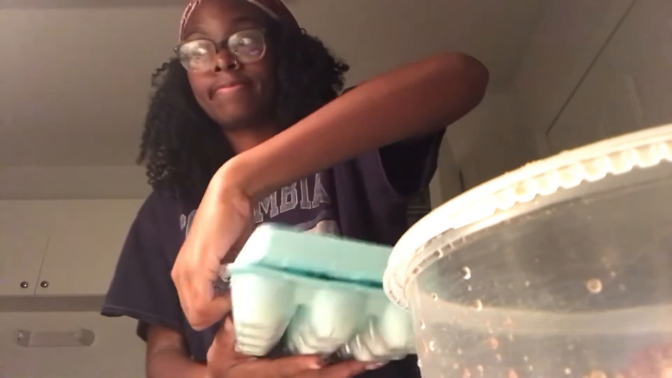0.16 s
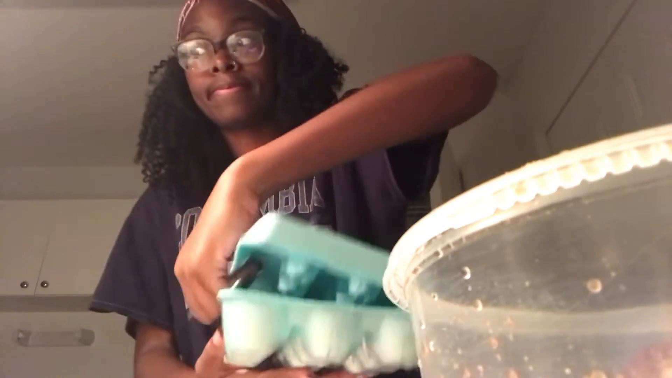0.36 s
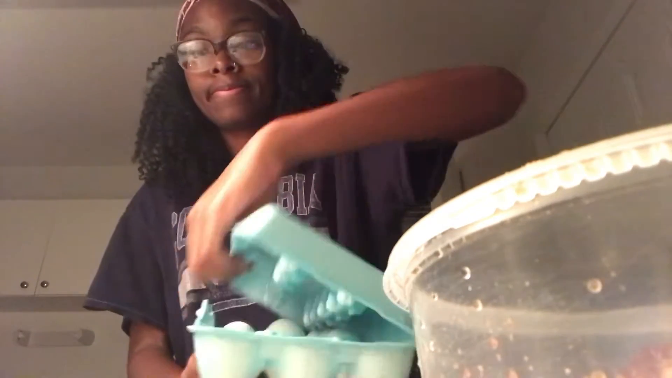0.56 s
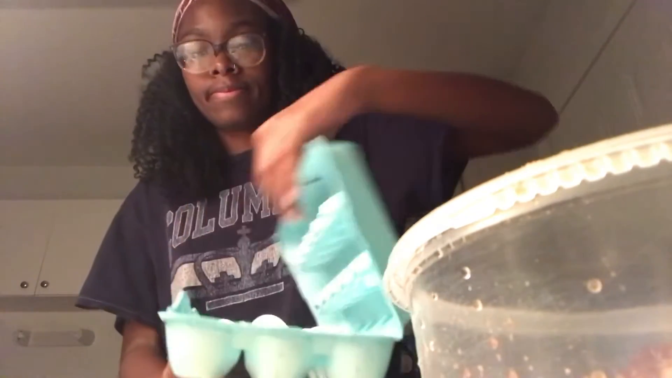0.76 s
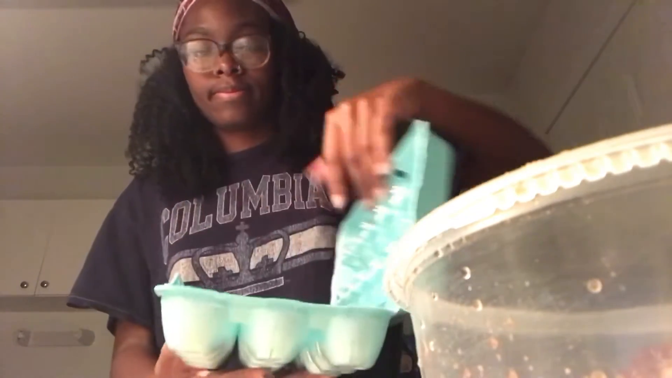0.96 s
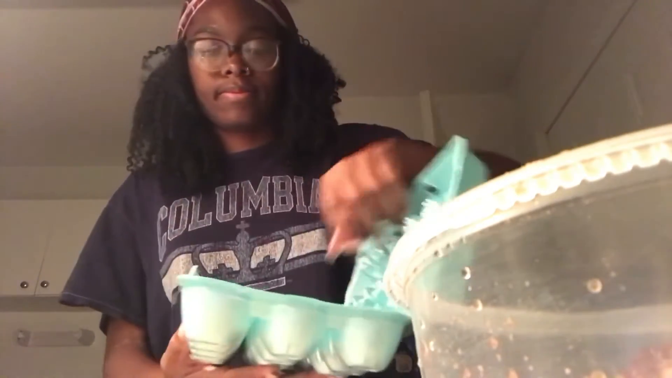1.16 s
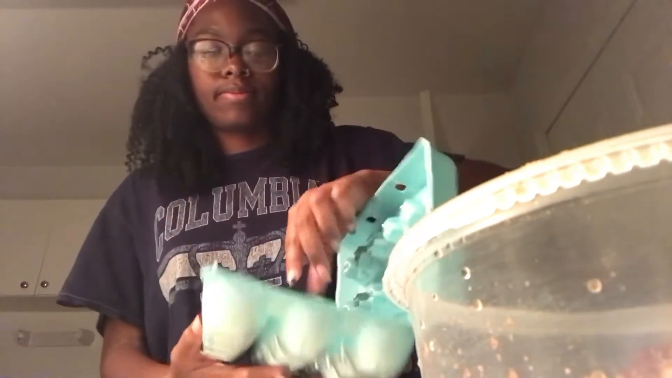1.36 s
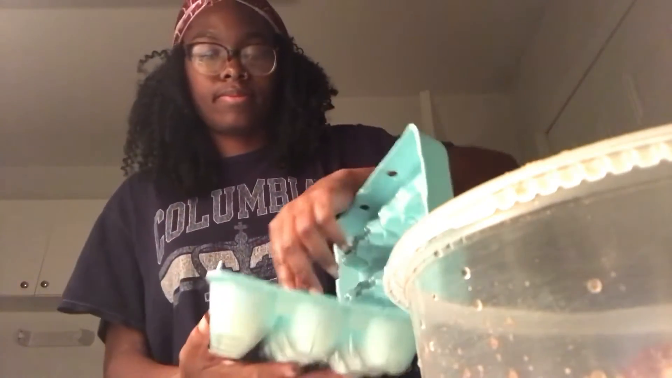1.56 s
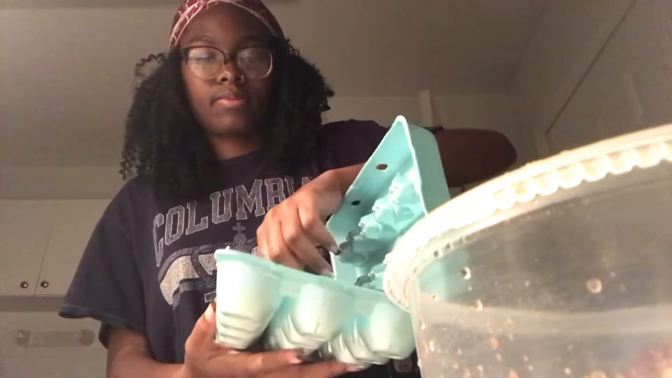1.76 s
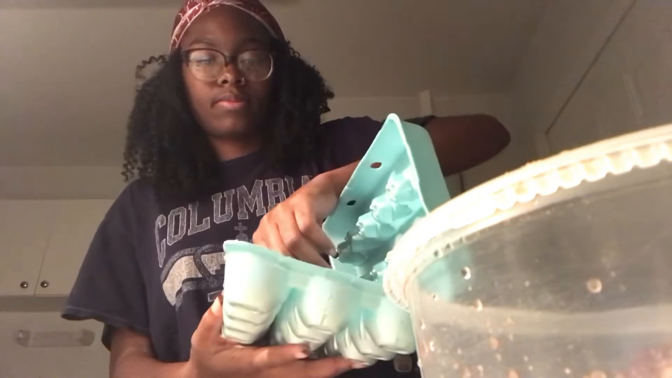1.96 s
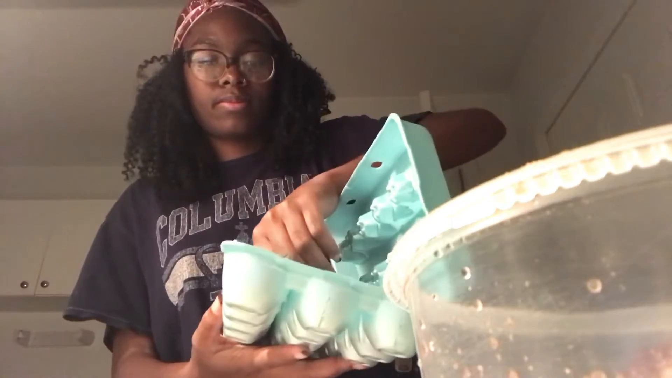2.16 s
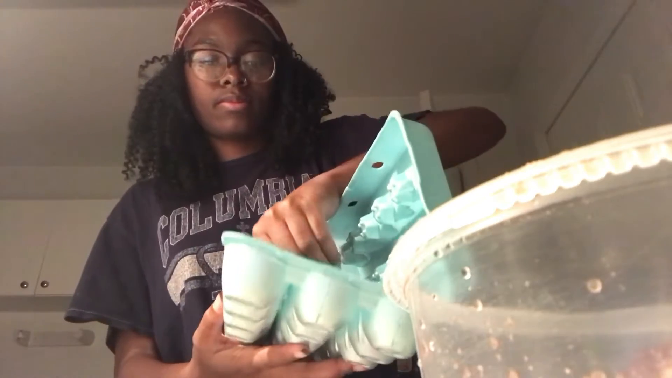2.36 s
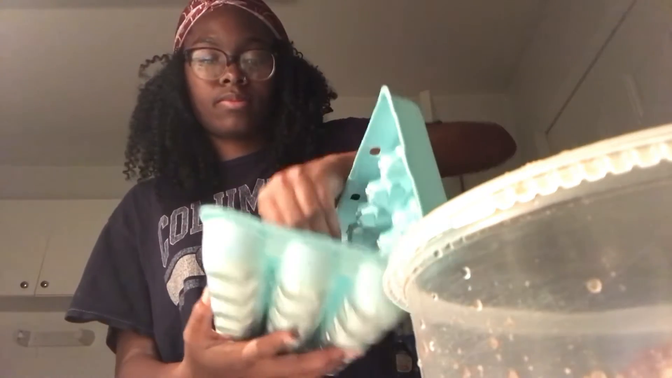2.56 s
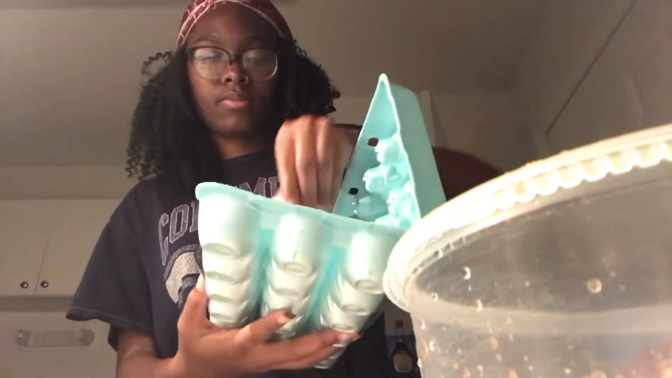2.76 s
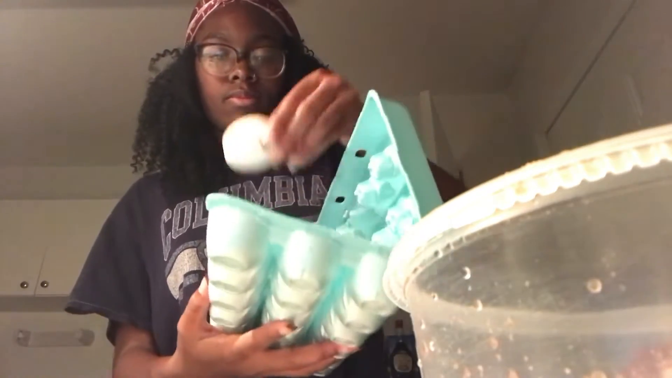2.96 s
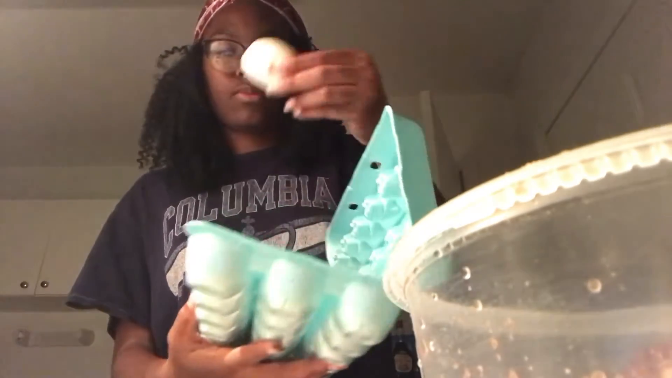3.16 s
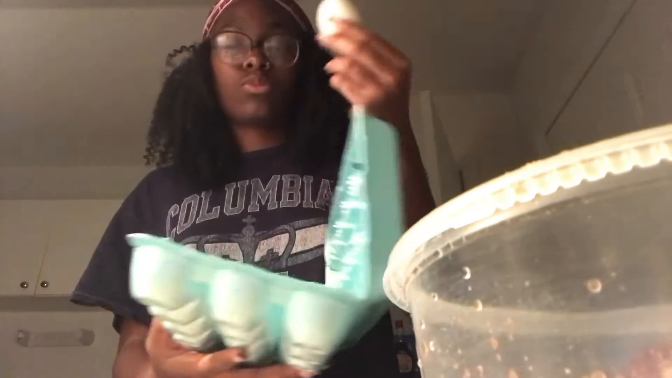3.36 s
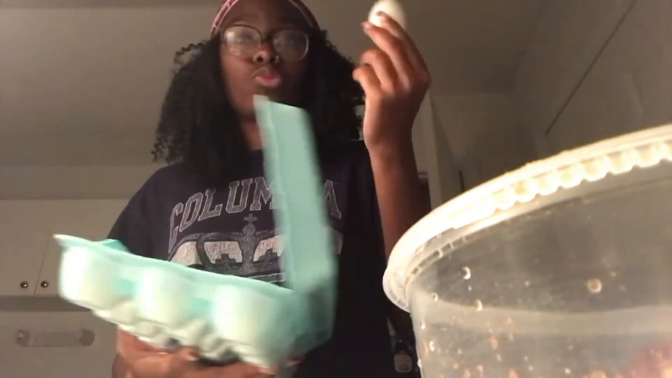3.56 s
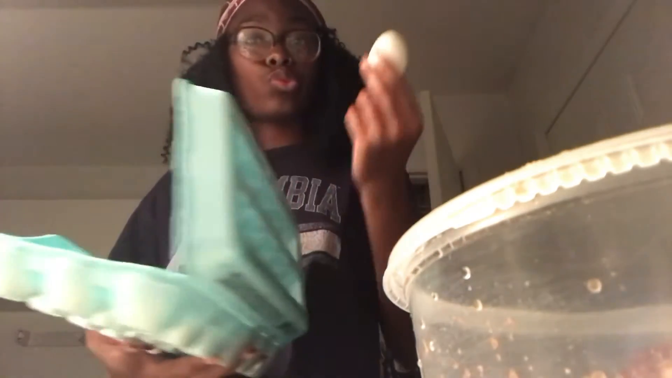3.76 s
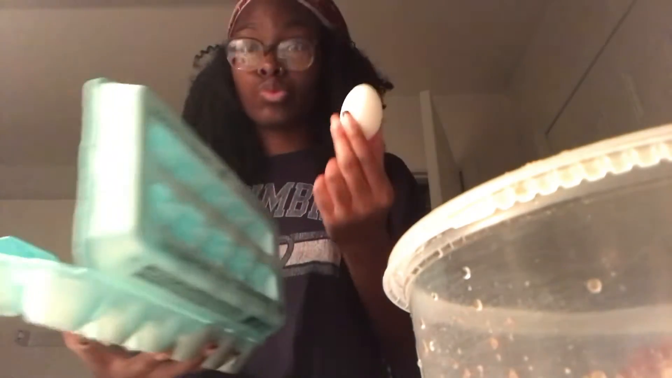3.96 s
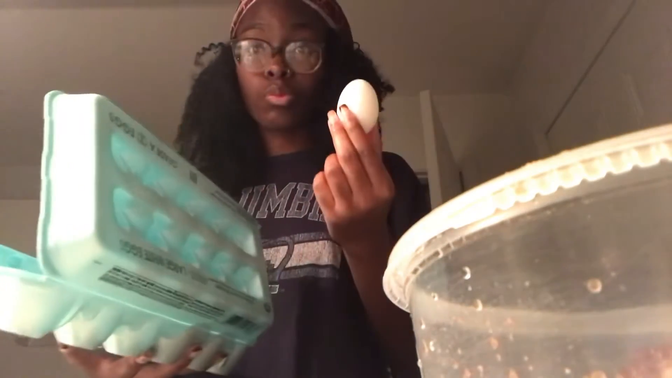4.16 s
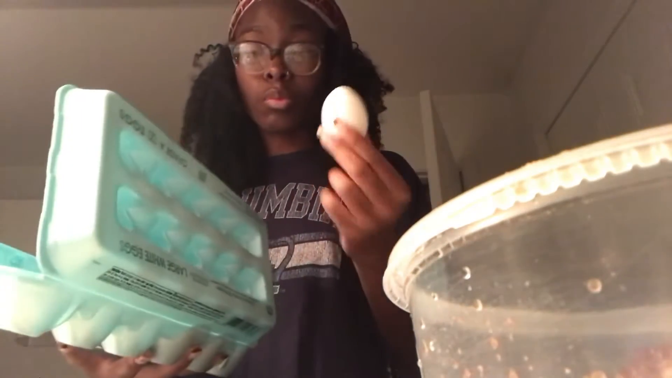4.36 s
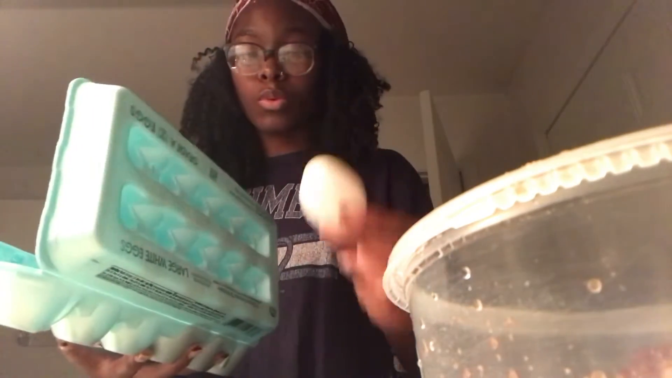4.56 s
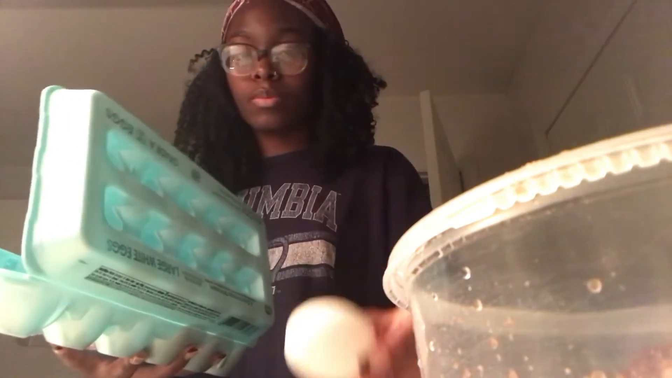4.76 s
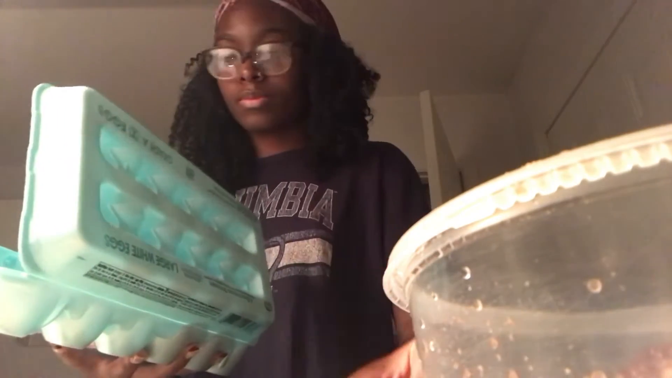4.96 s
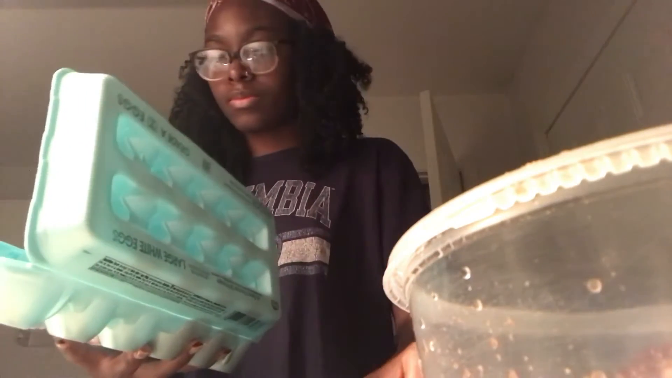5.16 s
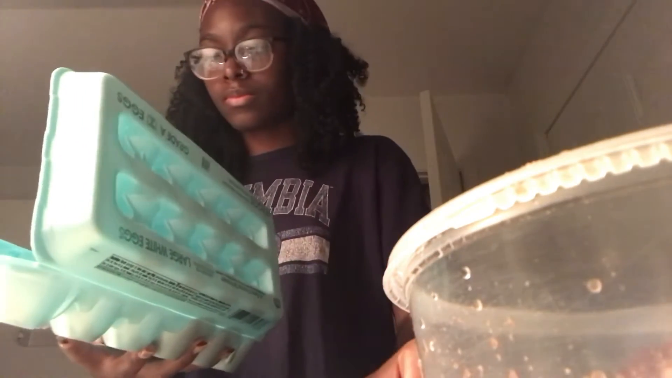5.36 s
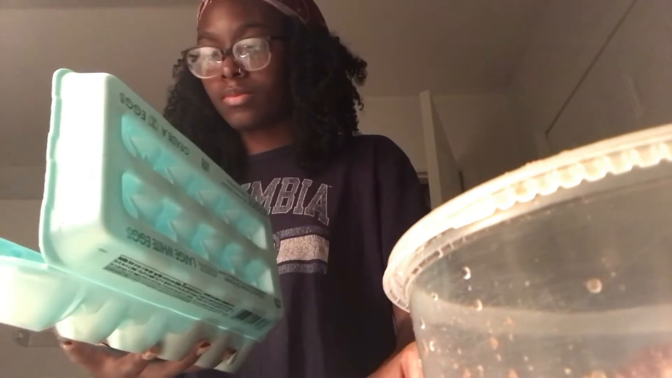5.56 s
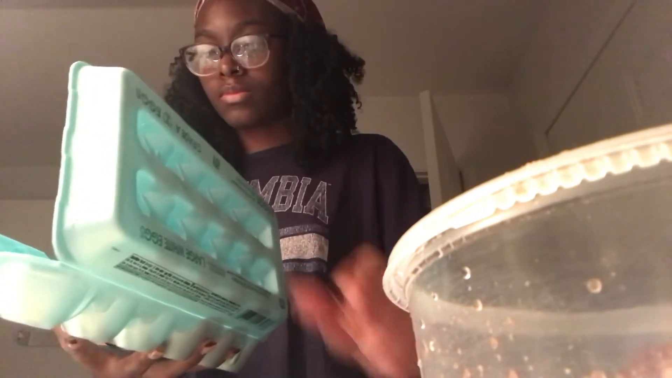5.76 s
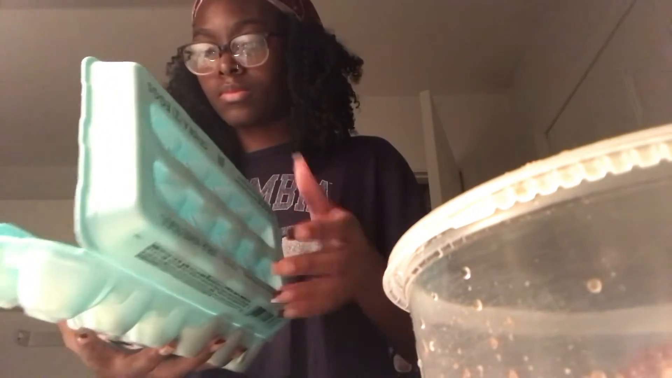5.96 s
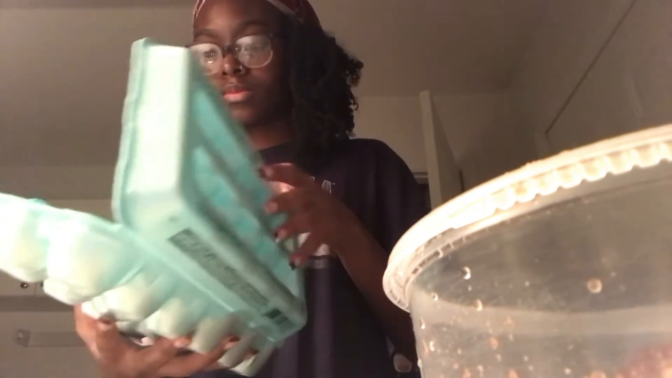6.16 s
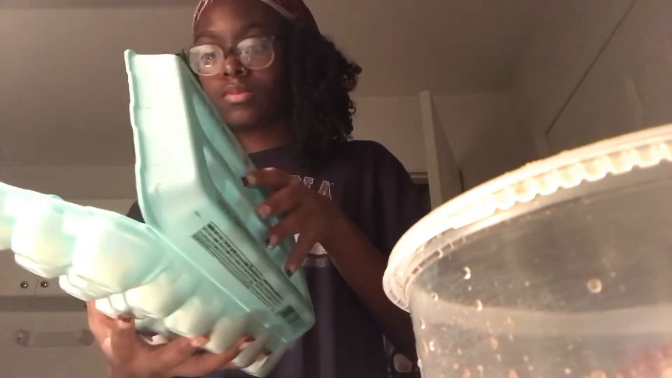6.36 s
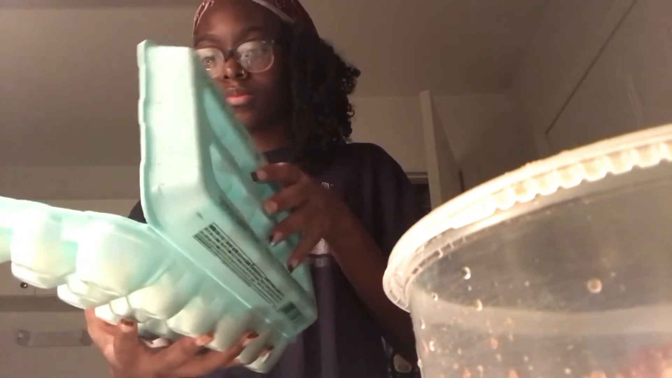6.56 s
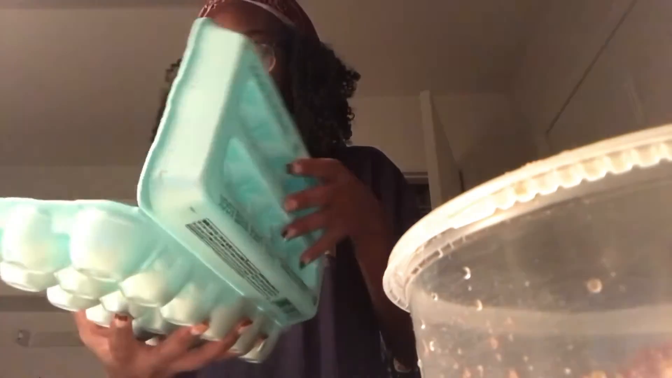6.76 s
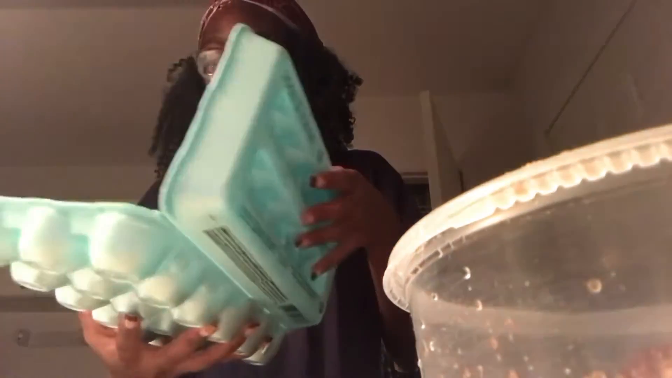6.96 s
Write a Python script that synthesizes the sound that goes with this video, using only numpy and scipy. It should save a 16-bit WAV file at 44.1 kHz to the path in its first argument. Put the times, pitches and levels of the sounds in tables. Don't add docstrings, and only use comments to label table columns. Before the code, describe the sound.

A foam egg carton is prised open close up with loud scraping, a sharp crack and squeak, then an egg knocks down on a counter.

```python
import sys
import numpy as np
from scipy import signal
from scipy.fft import rfft, irfft
from scipy.io import wavfile

SR = 44100
rng = np.random.default_rng(int(sys.argv[2]) if len(sys.argv) > 2 else 0)


def unload_audio(sound):
    columns = np.transpose(np.atleast_2d(sound))
    steps = np.round(np.clip(columns, -1, 1) * 32767)
    wavfile.write(sys.argv[1], SR, steps.astype(np.int16))


def invert_db(x):
    u = np.asarray(x, float) / 20
    return 10 ** u


N = 308700


def rms_one(x):
    return x / np.sqrt(np.mean(x ** 2) + 1e-20)


def in_time(spans, columns):
    rows = []
    for span in spans:
        span = np.array(span, float)
        before = [span[0, 0] - .02, -100, *span[0, 2:]]
        after = [span[-1, 0] + .03, -100, *span[-1, 2:]]
        rows += [before, *span, after]
    rows = np.array(rows)
    rows = rows[np.argsort(rows[:, 0], kind="stable")]
    return [np.interp(np.arange(N) / SR, rows[:, 0], rows[:, k]) for k in range(1, columns + 1)]


def coloured(x, spectrum):
    hz, points = np.fft.rfftfreq(N, 1 / SR) + 1, np.array(spectrum)
    level_db = np.interp(np.log(hz), np.log(points[:, 0]), points[:, 1])
    return rms_one(irfft(rfft(x) * invert_db(level_db), N))


def band(x, low_hz, high_hz):
    return signal.sosfilt(signal.butter(2, [low_hz, high_hz], "band", fs=SR, output="sos"), x)


def drift(rate):
    r = np.exp(-2 * np.pi * rate / SR)
    return rms_one(signal.lfilter([1], [1, -2 * r, r * r], rng.standard_normal(N + SR))[SR:])


def resonance(x, hz, width):
    r = np.exp(-np.pi * width / SR)
    gain = (1 - r * r) / 2
    return signal.lfilter(gain * np.array([1, 0, -1]), [1, -2 * r * np.cos(2 * np.pi * hz / SR), r * r], x)


def ring(clicks, hz, t60):
    r, w = invert_db(-60 / (t60 * SR)), 2 * np.pi * hz / SR
    return signal.lfilter([0, np.sin(w)], [1, -2 * r * np.cos(w), r * r], clicks + 1e-18)


def grains(per_s, spread_db):
    sizes = invert_db(spread_db * np.minimum(rng.exponential(1, N), 4)) * rng.choice([-1, 1], N)
    return sizes * (rng.random(N) < per_s / SR)


def struck(hits, modes, spread_db, contact_hz=300, sign=-1):
    out, chance = np.zeros(N), rng.standard_normal((len(hits), len(modes)))
    for (s, peak_db, *soft), draws in zip(hits, chance):
        push = np.zeros(SR // 2)
        length = max(round(SR / 2 / (soft[0] if soft else contact_hz)), 2)
        push[:length] = np.hanning(length + 2)[1:-1] * 2 / length
        at = round(s * SR)
        for k, ((hz, mode_db, t60), draw) in enumerate(zip(modes, draws)):
            level = invert_db(peak_db + mode_db + spread_db * draw) * sign ** k
            out[at:at + len(push)] += level * ring(push, hz, t60)[:N - at]
    return out


def wavering(rows, orders, waver, flutter_db, rate):
    level_db, pitch = in_time([rows], columns=2)
    phase = 2 * np.pi * np.cumsum(pitch * (1 + waver * drift(rate))) / SR
    tone = sum(invert_db(order_db) * np.sin(k * phase) for k, order_db in orders)
    return invert_db(level_db + 4 + flutter_db * drift(rate / 3)) * tone


def foam_body(slips, ringing_db):
    # f/Hz, level/dB per Hz
    foam = [(150, -28), (250, -1), (386, -1.5), (468, 2.5), (586, -2), (845, 0), (922, -1), (1380, -5),
            (1730, -7), (3910, -8.5), (7700, -19), (14200, -21.5), (16000, -21.5)]
    # f/Hz, width/Hz, level/dB
    cups = [(554, 680, -5), (720, 17, -14), (850, 26, -3), (1150, 20, 13), (1450, 190, 6.5), (2500, 80, 11),
            (3170, 250, -9), (3660, 22, 0), (6300, 210, -2.5), (8000, 130, -30.5)]
    ringing = np.zeros(N)
    for k, (f, width, level_db) in enumerate(cups):
        ringing += invert_db(level_db) * resonance(slips, f, width) * (-1) ** k
    body = rfft(coloured(slips, foam) + invert_db(ringing_db) * ringing)
    hz = np.fft.rfftfreq(N, 1 / SR)
    low = 1 / (1 + (hz / 1300) ** 4)
    high = 1 - 1 / (1 + (hz / 5500) ** 4)
    return [rms_one(irfft(body * share, N)) for share in (low, 1 - low - high, high)]


def shell(x, t60, ringing_db):
    after = np.arange(SR // 20) / SR
    modes = rng.standard_normal(len(after)) * invert_db(-60 * after / t60)
    modes = invert_db(ringing_db) * modes / np.sqrt(np.sum(modes ** 2))
    modes[0] = 1
    return signal.fftconvolve(x, modes / np.sqrt(np.sum(modes ** 2)))


def rubbing():
    # hardest at t/s, rise/s, fall/s, pressure level/dB, hollow-cup share/dB
    prising = [(.004, 0.019, 0.095, -36.5, -1), (.112, 0.034, 0.12, -32.5, 4.5),
               (.18, 0.059, 0.073, -27, -7.5), (.216, 0.029, 0.24, -31.5, 2),
               (.26, 0.024, 0.039, -47, 14.5), (.35, 0.12, 0.097, -33, -16), (.43, 0.035, 0.21, -42, -17),
               (.528, 0.04, 0.033, -48.5, 6.5), (.6, 0.087, 0.23, -46, -8)]
    folding = [(.8, 0.087, 0.16, -38.5, -8), (.93, 0.18, 0.06, -54.5, 5.5), (1.006, 0.066, 0.079, -41.5, 4),
               (1.098, 0.06, 0.15, -38, -7.5), (1.216, 0.024, 0.034, -28.5, -5),
               (1.295, 0.049, 0.033, -32, -4.5), (1.365, 0.059, 0.12, -31, -6),
               (1.476, 0.032, 0.046, -38.5, -14), (1.55, 0.082, .08, -54.5, -8),
               (1.61, 0.018, 0.13, -39.5, -14), (1.656, 0.068, 0.034, -36.5, -8)]
    picking = [(1.81, 0.13, 0.24, -48, -9), (1.95, 0.078, 0.066, -51.5, -5), (1.998, 0.0086, 0.02, -54, -1),
               (2.02, 0.0041, 0.11, -34.5, 0), (2.146, 0.051, 0.03, -38, -10), (2.226, 0.09, 0.072, -50, 0),
               (2.306, 0.035, 0.083, -42, -4.5), (2.39, 0.064, 0.12, -48.5, 5.5),
               (2.458, 0.092, 0.031, -41, 0), (2.54, 0.024, 0.16, -42.5, -8),
               (2.62, 0.11, 0.05, -42.5, -0.5)]
    lifting = [(2.728, 0.013, 0.063, -34, -3), (2.782, 0.066, 0.024, -40, -6),
               (2.81, 0.044, 0.13, -54.5, 10.5), (2.836, 0.0072, 0.012, -59, -16),
               (2.87, .03, 0.38, -62, -2)]
    turning = [(3.43, 0.2, 0.15, -56.5, -20), (3.58, 0.26, 0.1, -51, -12), (3.67, 0.092, 0.077, -41, -7),
               (3.72, 0.0058, 0.053, -40, -6), (3.8, .05, 0.29, -63, -7), (5.068, 0.0059, 0.013, -42, 1.5),
               (5.05, 0.17, 0.24, -60.5, 2), (4.53, 0.13, 0.13, -69, 19)]
    gripping = [(6.14, 0.053, 0.065, -54, -4), (6.17, 0.01, 0.07, -51.5, 2), (6.25, 0.016, 0.17, -48.5, 8),
                (6.3, 0.025, .04, -57, -3), (6.386, 0.052, 0.1, -48.5, -3), (6.47, 0.05, 0.072, -54.5, 0),
                (6.776, 0.025, 0.082, -48, -3), (6.858, 0.013, 0.047, -60.5, 18),
                (6.93, 0.19, .06, -47, -26)]
    # strokes, finger-hiss share/dB, lower hollow f/Hz, upper hollow f/Hz
    grips = [(prising, -1, 650, 1390), (folding, 0, 635, 2300), (picking, -1.8, 840, 1530),
             (lifting, 0.9, 630, 2700), (turning, -1, 1150, 3300), (gripping, 0, 1120, 5700)]
    depth_db, roundness = 22.5, 1.44
    hollow_levels_db = (-0.5, -8.5)

    low, mid, high = foam_body(grains(9000, spread_db=2.0), ringing_db=-29.0)
    out, now = np.zeros(N + SR), np.arange(N) / SR
    grip = invert_db(-5 + 1.4 * drift(70))
    low, high = low * invert_db(2.0 * drift(25)), high * invert_db(0.15 * drift(36))
    for strokes, hiss_db, *hollows in grips:
        for s, rise_s, fall_s, pressure_db, hollow_db in strokes:
            at = slice(max(round((s - 2 * rise_s) * SR), 0), round((s + 2 * fall_s) * SR))
            away = np.maximum((s - now[at]) / rise_s, (now[at] - s) / fall_s)
            easing_db = -depth_db * np.maximum(away, 0) ** roundness
            slips = invert_db(hollow_db - 0.03 * easing_db) * low[at] + mid[at]
            slips = slips + invert_db(hiss_db + 0.17 * easing_db) * high[at]
            slips = slips + sum(invert_db(db) * resonance(slips, hz, .18 * hz)
                                for hz, db in zip(hollows, hollow_levels_db))
            sound = shell(invert_db(pressure_db + easing_db) * grip[at] * slips, t60=.05, ringing_db=-7)
            out[at.start:at.start + len(sound)] += sound
    return out[:N]


def snaps():
    # t/s, peak level/dB, low share/dB, high share/dB
    tears = [(0.0114, -14, -0.5, -10.5), (0.0857, -17.5, -28, -4), (0.105, -15, -14, -22),
             (0.126, -21, -18, -16), (0.1755, -10.5, -15, -9), (0.3994, -26.5, -19, 5.5),
             (1.2613, -17, -4.5, -12), (1.5945, -41, -16, 17), (1.6533, -30, -22, -21),
             (1.8067, -28, -14, -21), (1.9949, -26, -9, -20), (2.0212, -24, 6, -1), (2.3395, -42, 19, -18),
             (2.711, -46.5, -17, 20.5), (2.843, -46.5, 7, 18.5), (3.5934, -37, 7, -14.5),
             (3.7167, -19.5, -24, -7.5), (4.11, -44, -9, -14), (4.4635, -45, 15, 7), (4.6474, -60, 15, 0),
             (5.044, -49.5, -12, 18), (5.0645, -44, 5, -10), (5.795, -48, 11, -19), (6.16, -31.5, 15, -7),
             (6.2367, -19, -9, -18), (6.33, -34.5, 5, 1), (6.37, -40, -8, 6)]
    # t/s, peak level/dB, low share/dB, high share/dB
    slips = [(0.0613, -28, -15, -8), (0.1366, -26, -12, -8), (0.162, -19, -14, -8), (1.1508, -27, -8, -5),
             (1.2022, -27, -10, 6), (1.2865, -30, -12, 7), (1.3434, -34, -27, 10), (1.3504, -35, -13, 14),
             (1.365, -33, -12, 13), (1.378, -34, -8, 6), (2.09, -40, -10, 6), (3.63, -44, -7, 2),
             (3.645, -44, -10, 2), (3.68, -44, -6, 4), (1.458, -34, -10, 10), (1.643, -50, -10, 10),
             (1.657, -48, -10, 7), (2.1395, -39, -10, -4), (2.2892, -45, -10, -1), (2.5386, -40, -10, 11),
             (2.5456, -37, -10, 7), (2.7232, -43, -14, 8), (6.2906, -40, -8, -3)]
    # t/s, peak level/dB, low share/dB, high share/dB
    cracks = [
        (0.2108, -2.5, -7.5, -1.5),
        (5.215, -37.5, 11, 5.5),
    ]
    low, mid, high = foam_body(grains(14000, spread_db=3), ringing_db=2)
    out, after = np.zeros(N), np.arange(SR // 5) / SR
    for rows, t60 in ((tears + slips, 0.053), (cracks, 0.041)):
        rise = np.minimum(after / 0.00024, 1)
        decay_db = -60 * np.maximum(after - .006, 0) / t60
        for s, peak_db, low_db, high_db in rows:
            at = slice(round(s * SR), round(s * SR) + len(after))
            tearing = invert_db(low_db) * low[at] + mid[at] + invert_db(high_db) * high[at]
            out[at] += rise * invert_db(peak_db - 16.5 + decay_db) * tearing
    return out


def panels():
    # t/s, half-
    # length/s, level/dB, f/Hz
    carton_panels = [(0.108, 0.0074, -31, 1392), (0.131, 0.0069, -26.5, 1430), (0.116, 0.014, -32, 1157),
                     (0.117, 0.014, -36, 1980), (0.118, .01, -32.5, 2760), (.128, 0.013, -31.5, 754),
                     (.167, .012, -33, 1450), (0.187, 0.017, -33, 720), (.256, 0.0069, -33, 520),
                     (.258, 0.011, -33, 1100), (0.285, 0.027, -34.5, 65.4), (0.318, 0.0092, -42, 3020),
                     (.525, .012, -48, 3140), (1.108, .015, -46, 1590), (1.125, .02, -47, 1353),
                     (1.22, 0.01, -35.5, 1520), (1.305, .012, -50, 1560), (1.279, 0.015, -45, 990),
                     (3.311, .006, -58, 3050), (3.411, 0.013, -53, 3070), (3.455, .006, -58, 3050),
                     (3.482, .008, -64, 3050), (3.505, .008, -55, 3080), (3.51, 0.013, -50, 3980),
                     (3.316, .02, -64, 4200), (3.598, .008, -54, 3570), (4.538, .025, -55, 1010),
                     (4.535, 0.022, -59, 850), (4.599, .04, -59, 437), (6.125, .015, -60, 2460),
                     (6.14, .012, -57, 1900), (6.246, 0.025, -38, 55.2), (6.335, .01, -51, 1880),
                     (6.337, .01, -49, 1000), (6.387, .01, -46, 2880), (6.47, 0.016, -58, 2700),
                     (6.3, .012, -55, 3500), (6.302, .012, -51, 2680), (6.375, .008, -54, 3650),
                     (6.405, .008, -52, 3280), (6.3, .03, -32.5, 108), (0.513, .012, -45.5, 1390),
                     (0.546, 0.01, -48, 720), (1.174, 0.017, -42, 720), (1.22, 0.018, -38, 710),
                     (1.275, .015, -39, 720), (1.5, 0.028, -47, 152), (2.8, 0.047, -46.5, 152),
                     (6.485, 0.022, -54, 1023),
                     (0.218, .005, -27, 2500), (0.219, .004, -27, 1500), (0.29, .015, -37, 750),
                  (1.255, .015, -31, 110), (1.285, .015, -41, 220), (1.64, .025, -46, 2150),
                  (1.65, .015, -48, 1150), (2.027, .008, -34, 1500), (2.035, .012, -37, 1000),
                  (2.032, .012, -42, 3450), (2.027, .007, -43, 4150), (2.035, .015, -50, 9600),
                  (2.025, .005, -46, 5800), (2.15, .02, -47, 1480), (2.41, .025, -47, 820),
                  (2.465, .012, -47, 700), (2.57, .035, -47, 830), (2.55, .012, -48, 1500),
                  (2.58, .04, -53, 3200), (2.555, .02, -55, 8000), (2.55, .012, -54, 5800),
                  (2.6, .04, -57, 13000), (2.73, .012, -50, 5500), (2.73, .008, -44, 2900),
                  (2.78, .04, -45, 640), (3.28, .006, -62, 3050), (3.37, .008, -60, 3080),
                  (3.41, .015, -58, 4300), (3.54, .01, -58, 3050), (3.56, .03, -60, 6300),
                  (3.6, .008, -55, 3050), (3.66, .03, -57, 6300), (3.725, .004, -47, 3150),
                  (3.725, .008, -45, 1300), (5.068, .006, -51, 1650), (5.105, .02, -42, 105),
                  (5.19, .008, -47, 200), (5.33, .03, -42, 230), (3.45, .08, -62, 3090),
                  (5.43, .03, -48, 600), (6.2, .014, -36, 480), (6.184, .004, -32, 520)]
    relative_width = 0.028
    out, now = np.zeros(N), np.arange(-SR // 10, SR // 10) / SR
    for s, half_s, level_db, hz in carton_panels:
        swell = np.exp(-(now / half_s) ** 2)
        tone = rng.standard_normal(len(now))
        for _ in range(2):
            tone = resonance(tone, hz, relative_width * hz)
        loudness = np.sqrt(np.sum((swell * tone) ** 2) / np.sum(swell ** 2))
        at = round(s * SR) - SR // 10
        out[at:at + len(now)] += invert_db(level_db) * swell * tone / loudness
    return out


def squeak():
    # t/s, level/dB, f/Hz
    course = [(.32, -58, 3700), (.336, -48, 3800), (.345, -29, 3870), (.362, -35, 3870), (.372, -45, 3880),
              (.383, -39, 3890), (.405, -53, 3880), (.43, -50, 3880), (.585, -61, 3860)]
    # multiple of f, level/dB
    orders = [(1, 0), (2, -16), (3, -15), (4, -20)]
    return wavering(course, orders, waver=.008, flutter_db=3.5, rate=300)


def whine():
    # t/s, level/dB, f/Hz
    course = [(4.53, -73, 2780), (4.575, -72, 3120), (4.65, -74, 3250)]
    return wavering(course, [(1, 0)], waver=.01, flutter_db=4, rate=200)


def creak():
    # t/s, level/dB
    spans = [
        [(3.26, -76), (3.36, -70), (3.41, -64), (3.6, -66)],
    ]
    # f/Hz, level/dB, t60/s
    hinge = [(3070, -3, .03), (3730, -13, 0.018), (4200, -11, 0.025), (6280, -16, .012)]
    level_db, = in_time(spans, columns=1)
    slips = grains(300 * invert_db(4 * drift(30)), spread_db=2.5)
    modes = sum(invert_db(mode_db) * ring(slips, hz, t60) for hz, mode_db, t60 in hinge)
    return invert_db(level_db + 8.5) * rms_one(modes)


def lid_flaps():
    # t/s, peak level/dB
    flaps = [(0.214, -19.5), (0.26, -22.5), (1.146, -16), (1.174, -20), (1.187, -14), (1.214, -16),
             (1.238, -27), (1.259, -21), (5.064, -28), (5.217, -25), (6.243, -15)]
    # f/Hz, level/dB, t60/s
    lid = [(106, -3, 0.19), (152, -12, 0.12), (212, -13, 0.09), (72, -22, 0.04), (365, -19, 0.09),
           (540, -19, 0.1), (720, -17, 0.13)]
    return struck(flaps, lid, spread_db=1.5, contact_hz=500)


def knocks():
    # t/s, peak level/dB, f/Hz
    dull = [(0.213, -9.5, 257), (0.221, -18.5, 507), (.25, -20, 424), (0.263, -34, 250), (1.171, -31, 363),
            (1.215, -36, 720), (1.191, -35, 212), (1.262, -26, 390), (1.995, -40, 1500), (2.019, -24, 1364),
            (2.021, -22.5, 1046), (2.021, -29, 3520), (2.02, -29.5, 9600), (2.341, -34, 670),
            (2.74, -30.5, 606), (2.748, -30, 150), (4.464, -28.5, 484), (5.065, -28.5, 198),
            (5.299, -30, 197), (5.334, -28, 235), (5.263, -20, 245), (0.212, -12.5, 1478),
            (0.212, -14, 2500), (0.212, -19.5, 3470), (1.147, -37, 493), (1.147, -17, 179),
            (1.194, -41, 550), (6.236, -37, 1530), (6.238, -37, 2780), (6.245, -28, 248)]
    # t/s, peak level/dB, f/Hz
    ticks = [(4.081, -51, 3150), (4.109, -43.5, 3050), (4.648, -48.5, 9500), (4.989, -50, 4100),
             (5.794, -45, 1650), (5.797, -50, 2050), (1.623, -30, 3470), (6.33, -58, 5400),
             (6.371, -49, 3700)]
    tick_t60 = .014
    out = np.zeros(N)
    for s, peak_db, hz in dull:
        t60 = 0.046 * (500 / hz) ** 0.037
        modes = [(hz, 0, t60), (1.35 * hz, -5, 0.51 * t60)]
        out += struck([(s, peak_db, 2.0 * hz)], modes, spread_db=1.0)
    for s, peak_db, hz in ticks:
        modes = [(hz, 0, tick_t60), (1.13 * hz, -4, tick_t60)]
        out += struck([(s, peak_db, 2.0 * hz)], modes, spread_db=0)
    return out


def egg_landing():
    # t/s, peak level/dB, softness of contact f/Hz
    blows = [
        (5.2152, -26, 1500),
        (5.2166, -7, 850),
        (5.2219, -15, 850),
        (5.2308, -18, 600),
        (5.262, -30, 450),
    ]
    # f/Hz, level/dB, t60/s
    counter = [(231, -6, 0.088), (361, -2.5, 0.059), (458, -4, 0.072), (557, -11.5, 0.082),
               (667, -12, 0.092), (723, -17, 0.16), (855, -22, 0.09)]
    return struck(blows, counter, spread_db=1, sign=1)


def shell_taps():
    # t/s, peak level/dB, softness of contact f/Hz
    taps = [(5.2152, -31, 3000), (5.2168, -27.5, 3000), (5.2205, -29, 3000)]
    # f/Hz, level/dB, t60/s
    eggshell = [(1227, -6, 0.05), (1390, 0, 0.035), (1593, -5, 0.05), (1943, -6, 0.03), (2150, -7, 0.03),
                (2650, -9, 0.04), (3300, -13, .02)]
    return struck(taps, eggshell, spread_db=0.5, sign=0.81)


def rocking():
    # t/s, peak level/dB, f/Hz
    tilts = [(5.333, -35, 390), (5.38, -26, 363.5), (5.412, -31, 402), (5.428, -26.5, 359),
             (5.447, -37, 353)]
    half_s, now = 0.011, np.arange(N) / SR
    out = np.zeros(N)
    for s, peak_db, hz in tilts:
        swell = np.exp(-((now - s) / half_s) ** 2)
        out += invert_db(peak_db - 1.0) * swell * np.sin(2 * np.pi * hz * now)
    return out


def palm_on_wall():
    # t/s, peak level/dB, softness of contact f/Hz
    contacts = [(6.1607, -28, 2500), (6.1625, -21.5, 1800), (6.1668, -22, 600), (6.1712, -23, 500)]
    # f/Hz, level/dB, t60/s
    wall = [(250, -13, 0.072), (459, 0, 0.064), (520, -12, .09), (683, -13, 0.064), (803, -4, 0.07),
            (980, -9, 0.066), (1300, -6, 0.03), (1450, -3, .025), (2020, -22, .03), (2500, -12, .03),
            (2940, -18, .04), (3240, -23, .03)]
    return struck(contacts, wall, spread_db=0)


def kitchen(x):
    t60 = 0.42
    after = np.arange(SR // 2) / SR
    decay = invert_db(-60 * after / t60)
    echoes = rng.standard_normal(len(after)) * decay * (after > .004)
    echoes = band(echoes, 130, 5050) + 0.098 * echoes * decay
    return signal.fftconvolve(x, echoes / np.sqrt(np.sum(echoes ** 2)))[:N]


def room_tone():
    # f/Hz, level/dB per Hz
    air_spectrum = [(15, -44), (25, -32), (43, -31), (65, -9), (80, -2), (111, -5), (142, -6.5), (245, -8),
                    (457, -11), (496, -13), (600, -12), (1830, -25), (3150, -29.5), (15200, -37),
                    (16500, -59.5)]
    # f/Hz, width/Hz, level/dB
    fridge = [(108, 16, -55), (239.3, 9.1, -58.5), (294.4, 6.7, -65)]
    # f/Hz, level/dB, phase wander/rad, wander rate/Hz
    hz, level_db, wander, rate = (57, -48, 1.1, 5)
    out = invert_db(-49) * coloured(rng.standard_normal(N), air_spectrum)
    phase = 2 * np.pi * hz * np.arange(N) / SR + wander * drift(rate)
    out += invert_db(level_db + 1.3 * drift(rate)) * np.sin(phase)
    for f, width, db in fridge:
        noise = resonance(rng.standard_normal(N), f, width)
        out += invert_db(db) * rms_one(resonance(noise, f, width))
    return out


def scene():
    carton = rubbing() + snaps() + squeak() + whine() + creak() + panels()
    blows = lid_flaps() + egg_landing() + palm_on_wall() + shell_taps() + knocks() + rocking()
    blows = band(blows, 95, 11000)
    echoes = kitchen(invert_db(-13.5) * carton + invert_db(-21) * blows)
    return (carton + blows + echoes + room_tone())[None]


def band_limit(x):
    return signal.sosfilt(signal.butter(12, 16810, fs=SR, output="sos"), x)


def record(dry):
    # f/Hz, width/Hz, share removed (0-1)
    port_dips = [(4850, 510, 0.35), (10400, 590, 0.47)]
    top = signal.ellip(10, .5, 55, 15800, fs=SR, output="sos")
    for hz, width, share in port_dips:
        dry = dry - share * resonance(dry, hz, width)
    return band_limit(signal.sosfilt(top, dry))


dry = scene()
out = record(dry)
unload_audio(out)
```